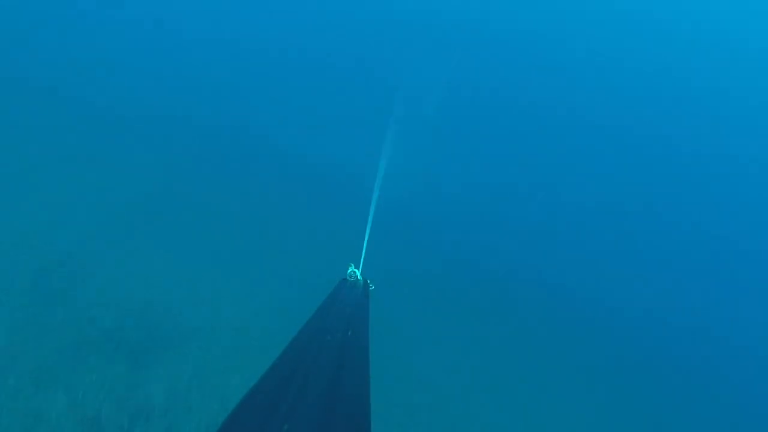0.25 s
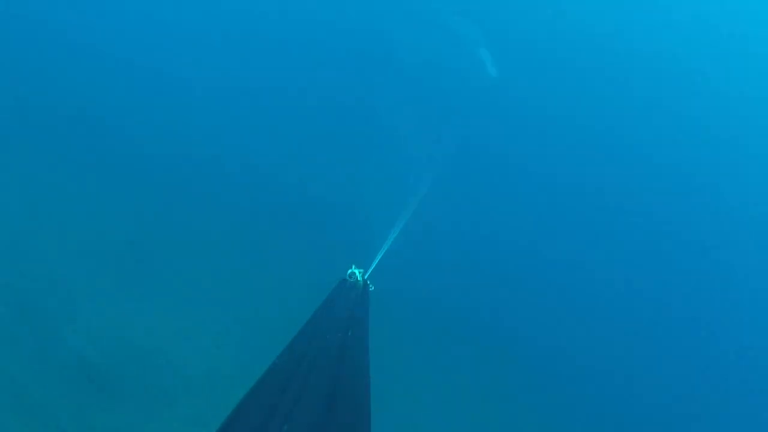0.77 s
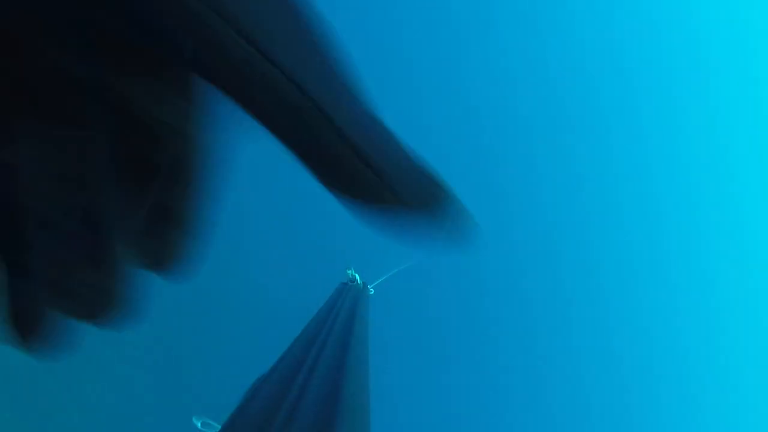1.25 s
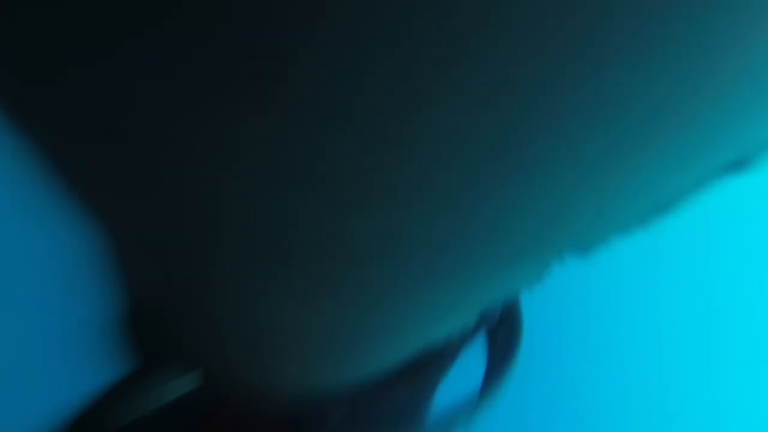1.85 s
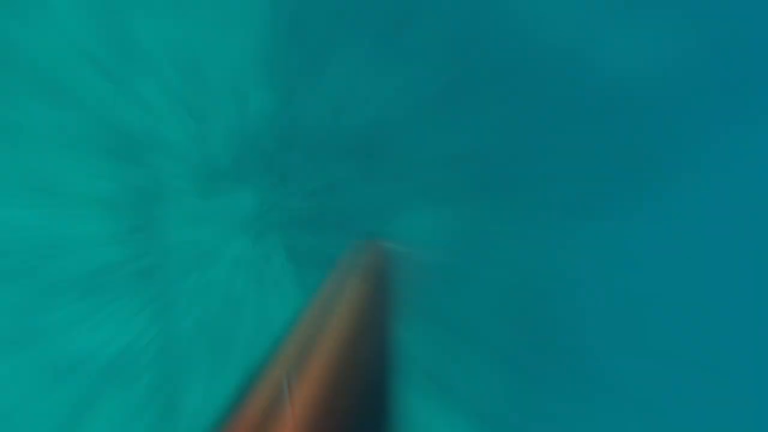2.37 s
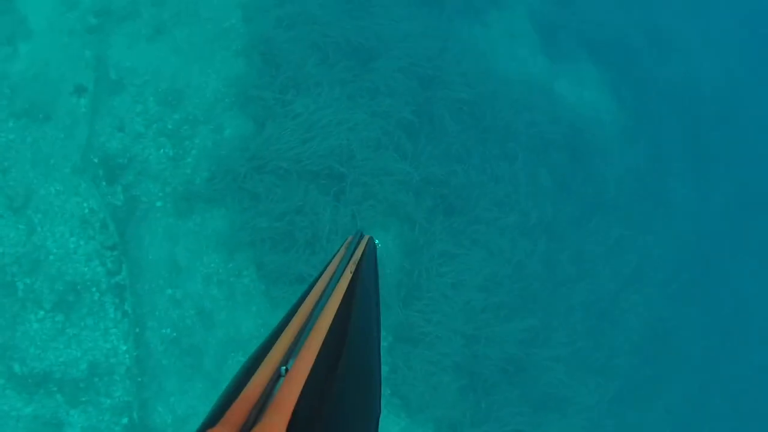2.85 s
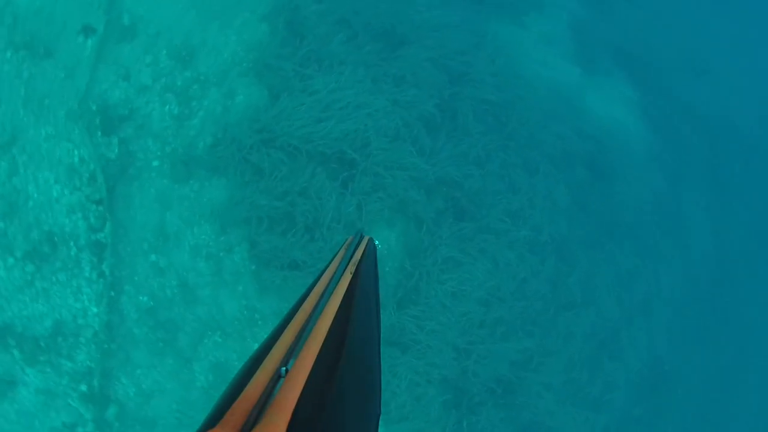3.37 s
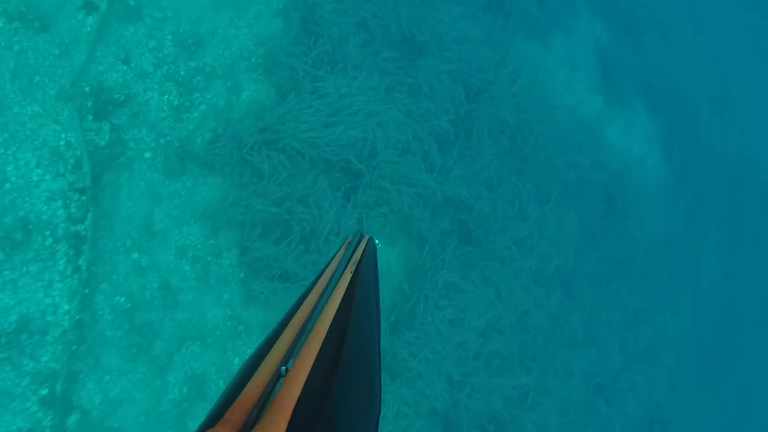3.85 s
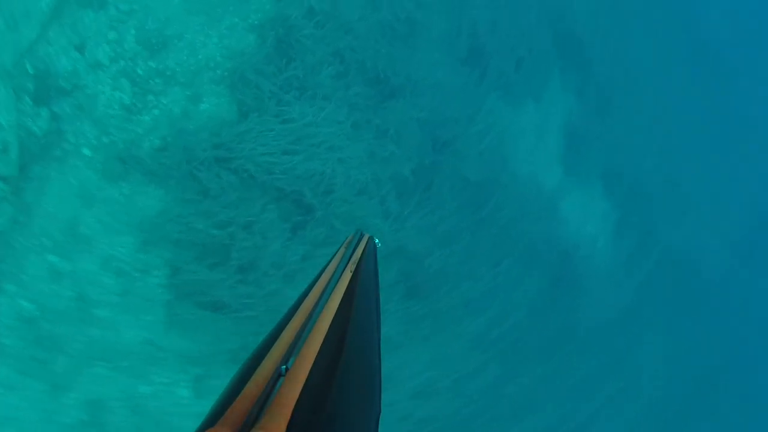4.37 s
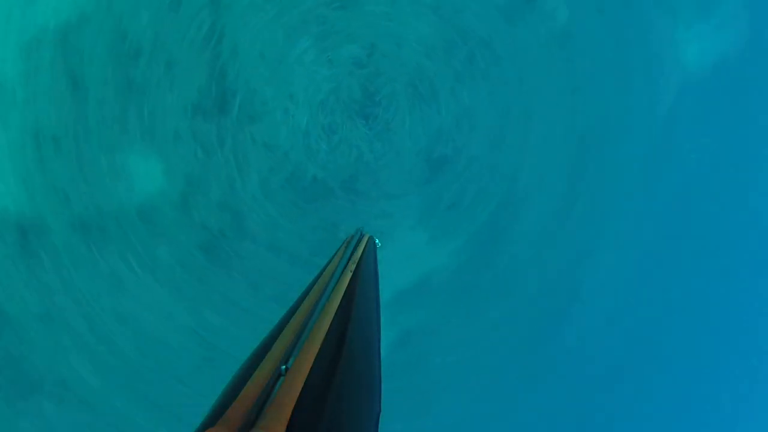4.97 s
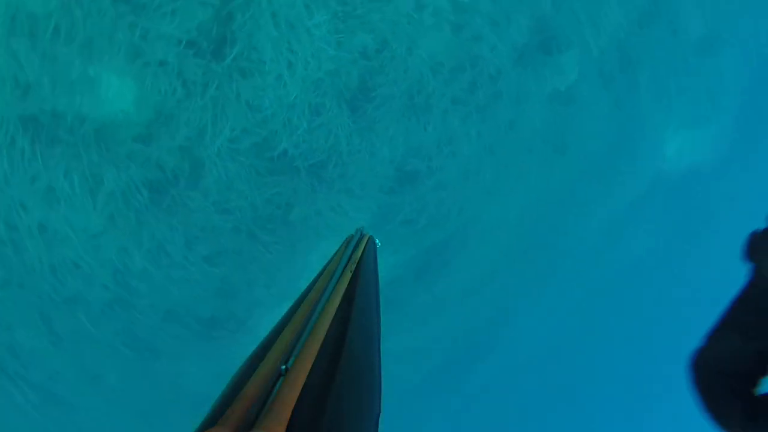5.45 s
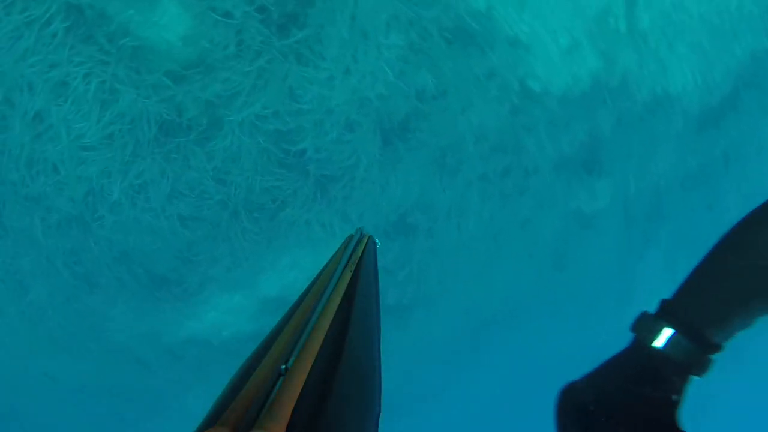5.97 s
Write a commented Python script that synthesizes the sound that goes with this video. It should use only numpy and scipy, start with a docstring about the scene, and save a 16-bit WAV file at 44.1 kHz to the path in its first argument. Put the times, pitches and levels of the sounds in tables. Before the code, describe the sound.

Muffled underwater glide: sinking hum, rushing water and squeaky glove handling fade abruptly into hushed sea, faint crackling clicks, soft stirrings and light taps.

```python
"""Water rushes past and a case drones, while a rubber-gloved hand rubs and shifts its grip, ticking and creaking.
A diver glides over sea grass with a camera; the microphone sits inside the sealed housing.
Then the sea is quiet: shrimp snap, something knocks softly, slow turns stir the water and loose gear taps.
Water is shaped noise and small grains, the drone a sinking tone; grip and gear are clicks rung through
the case, and shrimp are noise puffs and echoes. Table levels are relative: scene() trims the layers."""
import sys
import numpy as np
from scipy import signal
from scipy.fft import rfft, irfft
from scipy.io import wavfile
from scipy.ndimage import uniform_filter1d

SR = 44100
rng = np.random.default_rng(int(sys.argv[2]) if len(sys.argv) > 2 else 0)


def materialize(psi):
    """Save the field psi as 16-bit PCM at rate SR to the path in sys.argv[1].

    A 1-D psi becomes a single channel; in a 2-D psi each row is a channel.
    """
    bounded = np.clip(np.atleast_2d(psi).T, -1, 1)
    quanta = np.round(bounded * 32767).astype(np.int16)
    wavfile.write(sys.argv[1], SR, quanta)


N = 273861
TIME = np.arange(N) / SR

# The opening glide, dying to still water. Each row: time in seconds, buffeting in dB,
# rush of water and glove rubbing in dB.
GLIDE = [(0, -36, -37.5), (0.299, -32, -48.5), (0.6, -28, -55), (0.8, -28.5, -38.5), (1.25, -28, -41.5),
         (1.5, -34, -38), (1.62, -30.5, -31.5), (1.72, -20.5, -25.5), (1.789, -20.5, -24.5),
         (1.84, -30.5, -32), (1.93, -48, -42.5), (2.04, -35, -46.5), (2.25, -51.5, -53.5),
         (2.7, -56, -57.5)]
# Later turns of the body. Each row: full speed from in seconds, hold in seconds,
# buffeting in dB, gurgle in dB, wash in dB.
TURNS = [(2.891, 0.029, -41.5, -54.5, -53.5), (2.983, 0.063, -37.5, -49, -59.5),
         (3.198, 0.034, -50.5, -60.5, -63.5), (4.453, 0.11, -33, -45, -49), (4.65, 0.31, -39.5, -53, -49),
         (5.035, 0.046, -40, -52, -47.5), (5.251, 0.081, -53, -53.5, -54.5),
         (5.693, 0.22, -54.5, -55.5, -65)]
# Slow pressure swell at the housing, strong in the glide. Each row: time in seconds, level in dB.
SWELL = [(0, -34), (0.7, -26.5), (1.15, -22), (1.6, -27.5), (2.1, -29.5), (2.5, -46.5), (3.5, -47.5)]
# Spectra of the water against the housing. Each row: frequency in Hz, relative density in dB per Hz.
BUFFET_COLOUR = [(30, -29.5), (65, -9.5), (90, -6), (106, 8.5), (130, -10.5), (160, -8), (210, -20),
                 (330, -23.5), (430, -24.5), (600, -31), (1500, -45)]
RUSH_COLOUR = [(300, -7.5), (440, 2), (570, -12), (780, -2), (1000, 0.5), (1400, -9), (1850, -5.5),
               (2400, -8), (3200, -22.5), (6000, -37)]  # also the glove rubbing
GURGLE_COLOUR = [(300, -4), (440, -5.5), (570, -25.5), (740, -6.5), (870, 0), (1040, 2), (1250, -12),
                 (1450, -28), (2400, -16), (3200, -4)]
WASH_COLOUR = [(250, -13.5), (550, 2.5), (950, 8), (1400, 3.5), (1900, 0.5), (2450, -2), (2850, -8),
               (5000, -23.5)]
SWELL_COLOUR = [(10, -18), (22, -1), (30, -11.5), (45, -23), (80, -23), (300, -38), (1000, -80.5)]
TURN_RISE_S, TURN_FALL_S = 0.024, 0.063  # time constants
GLIDE_END_S = 2.39  # the water comes to rest
WAVER_DB, WAVER_KNOTS_PER_S = 4, 22  # the glide's buffeting wavers unevenly in level
BUFFET_EVENNESS = 0.48  # share of its own swings that a steady turn irons out


def water(buffet_db, rush_db, gurgle_db, wash_db, settle_s, gust_db):
    """Turbulence shakes the case near its main resonance; rush (with glove rubbing), gurgles, wash and swell."""
    buffet, rush = from_db(in_time(GLIDE))
    stirred_power = 0
    for start, hold, *levels in TURNS:
        envelope = held(start, start + hold, TURN_RISE_S, TURN_FALL_S)
        stirred_power = stirred_power + np.outer(from_db(levels), envelope) ** 2
    shake, gurgle, wash = np.sqrt(stirred_power)
    swell, = from_db(in_time(SWELL))

    waver = rms_one(from_db(WAVER_DB * drift(rate=WAVER_KNOTS_PER_S)))
    glide_buffet = buffet * waver * noise(BUFFET_COLOUR)
    turn_buffet = shake * evened(noise(BUFFET_COLOUR), BUFFET_EVENNESS)
    low = from_db(buffet_db) * (glide_buffet + turn_buffet)

    eddies = shower(count=1600, low_hz=600, high_hz=2600, cycles=20, spread_db=3.2)
    stream = rms_one(eddies) + from_db(-2) * rng.standard_normal(N)
    stream = stream * from_db(gust_db * drift(rate=69))
    moving = held(0, GLIDE_END_S, 1, settle_s)  # still water only hisses
    flowing = moving * rms_one(through(stream, pulse(RUSH_COLOUR)))
    still = (1 - moving) * noise(RUSH_COLOUR)
    glide = from_db(rush_db) * rush * (flowing + still)

    gurgling = from_db(gurgle_db) * gurgle * rms_one(through(stream, pulse(GURGLE_COLOUR)))
    washing = from_db(wash_db + gust_db * drift(rate=40)) * wash * noise(WASH_COLOUR)
    return low + glide + gurgling + washing + swell * noise(SWELL_COLOUR)


# Faint overtones of the drone. Each row: multiple of its pitch, level in dB re the tone.
DRONE_OVERTONES = [(2, -37.5), (3, -42.5), (4, -31.5), (5, -40.5)]
# The case hums above the drone. Each row: frequency in Hz, relative level in dB, 60 dB decay in seconds.
HUM_MODES = [(165, -28, 0.6), (228.5, -31.5, 0.29), (416.7, -26, 0.15), (510, -36.5, 0.22),
             (651, -39.5, 0.12)]
DRONE_HZ, DRONE_SAG_HZ_PER_S = 105.9, 49.3
DRONE_DB, DRONE_FADE_DB_PER_S = -12, 24.5  # rms at the start, before the waver
DRONE_END_S, DRONE_RELEASE_S = 0.344, 0.043  # release is a time constant


def drone(waver_db, hum_db):
    """Eddies lock to the case and drive one tone that sinks and fades as the flow slows; the case hums."""
    hz = DRONE_HZ - DRONE_SAG_HZ_PER_S * np.minimum(TIME, DRONE_END_S)
    level_db = DRONE_DB - DRONE_FADE_DB_PER_S * TIME + waver_db * drift(rate=71)
    gain = from_db(level_db) * held(0, DRONE_END_S, 1, DRONE_RELEASE_S)
    phase = 2 * np.pi * np.cumsum(hz) / SR
    overtones = sum(from_db(db) * np.sin(round(k) * phase) for k, db in DRONE_OVERTONES)
    tone = np.sin(phase) + overtones
    hum = 0
    for mode_hz, db, t60 in HUM_MODES:
        hum = hum + from_db(db) * evened(ring(rng.standard_normal(N), mode_hz, t60), share=0.59)
    return gain * np.sqrt(2) * tone + from_db(hum_db) * held(0, 0, 1, fall=0.55) * hum


# Single slips of rubber on the housing. Each row: start in seconds, relative peak in dB,
# sharp edge in dB re that, low boom in dB re that.
SLIPS = [(0.74, -16, -17.5, 0), (0.7497, -12, -8.5, -0.5), (0.756, -9.5, -16.5, 0), (0.764, -7, -27, -3.5),
         (0.773, -11, -10, 2), (0.8923, -10, -1, 2), (0.9097, -11, 0, 5), (1.0407, -10.5, 1.5, -1.5),
         (1.052, -8.5, -9.5, -1), (1.1101, -8.5, -5, -0.5), (1.1504, -14.5, 11, 4),
         (1.1612, -14.5, 8.5, 7.5), (1.1827, -20, 14, -2), (1.1897, -17, 4.5, -15.5), (1.1948, -9, 5, -8),
         (1.202, -15.5, 8, 4.5), (1.2065, -20, -8, 1.5), (1.2111, -9.5, -11, 2.5), (1.2965, -11.5, 0, 0),
         (1.3482, -15, 0, 6.5)]
# Creaks, where slips run together. Each row: start in seconds, length in seconds, first, middle and last
# slip rate in Hz, relative peak in dB, growth in dB, rubber resonance in Hz, contact ring in dB re the
# peak, contact ring in Hz.
CREAKS = [(1.119, 0.024, 210, 230.2, 164, -11.5, -4, 635, 11.5, 2130),
          (1.285, 0.06, 199.6, 150.5, 106, -11.5, 1.5, 805, -11, 1770),
          (1.362, 0.036, 98.3, 181, 114.4, -12.5, 0.5, 785, -11.5, 2040),
          (1.5005, 0.04, 166.6, 183.8, 140, -13.5, 2.5, 933, -19, 1300),
          (1.5974, 0.027, 186, 224.2, 165, -15, 0, 1020, -9.5, 1350),
          (1.655, 0.087, 159.8, 263.6, 202.4, -16.5, 0.5, 1110, -18, 1520),
          (1.772, 0.027, 228, 224, 176, -27, 10, 1270, 20.5, 2190),
          (1.851, 0.03, 280, 227.4, 233, -24, 3.5, 1120, -4, 1510)]
# Ringing of the case after a slip. Each row: frequency in Hz, relative level in dB, 60 dB decay in seconds.
CASE_MODES = [(102.3, -2.5, 0.15), (158, -44, 0.055), (240.5, -20, 0.14), (460, -27.5, 0.017),
              (910, -6, 0.023), (1210, -45.5, .025), (2030, -41, 0.058), (3495, -36, 0.026)]
# Spectra of a slip and of its sharp edge. Each row: frequency in Hz, relative density in dB per Hz.
SLIP_COLOUR = [(60, -25.5), (250, -2), (450, 2.5), (800, 7.5), (930, 8.5), (1080, -13.5), (1250, -5),
               (1450, -32), (2300, -17.5), (2600, -36), (3700, -26), (4600, -61), (9000, -64.5)]
EDGE_COLOUR = [(500, -34), (1200, 2), (1700, 13), (2350, 15), (2750, -18), (3700, 0), (4600, -9),
               (9000, -69)]
RUBBER_CUT_HZ = 4270  # rubber passes no high treble


def glove(slip_db, edge_db, creak_db, contact_db, creak_ring_db, grit_db, edge_lag_s):
    """Each slip of the gloved grip is one short pulse through the case wall, which then rings."""
    s, db, edge, boom = np.transpose(SLIPS)
    slips = clicks(s, db)
    creaks, creak_pulses, contact = sum(creak(row, uneven_db=1.4) for row in CREAKS)

    grit = from_db(grit_db) * scatter(slips + creaks, t60=0.03)
    edges = from_db(edge_db) * clicks(s + edge_lag_s, db + edge) + grit
    direct = from_db(slip_db) * through(slips, pulse(SLIP_COLOUR)) + through(edges, pulse(EDGE_COLOUR))

    creak_blows = from_db(creak_ring_db) * creaks
    boom_blows = clicks(s, db + boom) + creak_blows
    ringing = from_db(contact_db) * contact
    for k, (hz, mode_db, t60) in enumerate(CASE_MODES):
        blows = boom_blows if k == 0 else slips + creak_blows  # the boom is the lowest mode
        ringing = ringing + from_db(mode_db) * ring(blows, hz, t60)

    through_wall = bend(direct + ringing, hz=733, width_hz=950)
    soft = signal.butter(8, RUBBER_CUT_HZ, fs=SR, output="sos")
    return signal.sosfilt(soft, through_wall + from_db(creak_db) * creak_pulses)


# Faster slipping is weaker, sharper and rings higher: changes per octave of slip rate.
CREAK_LOSS_DB, CREAK_EDGE_DB, CREAK_RING_OCTAVES, RUBBER_GLIDE_OCTAVES = 0.5, 3.5, 0.55, 0.47
CREAK_JITTER = 0.08  # spread in cycles for a creak of 0 dB
CONTACT_WANDER, CONTACT_T60_S = 0.02, 0.016  # spread as a share of the pitch; 60 dB decay


def creak(row, uneven_db):
    """Rubber sticks and slips at an arching rate; gives the slips, their pulses and the contact ring."""
    s, length, first_hz, middle_hz, last_hz, db, growth_db, rubber_hz, edge_db, contact_hz = row
    early, strength, tension = rng.standard_normal((64, 3)).T
    place = 2 * (TIME - s) / length - 1  # -1 at the start, 1 at the end
    end_hz = np.where(place < 0, first_hz, last_hz)
    arch = middle_hz + (end_hz - middle_hz) * np.minimum(np.abs(place), 1) ** 2.5
    rate = arch * (np.abs(place) <= 1)
    turns = np.cumsum(rate) / SR
    count = int(turns[-1]) + 1
    at = np.searchsorted(turns, np.arange(count), side="right")
    # a harder grip slips less evenly
    times = at / SR + CREAK_JITTER * from_db(db) * early[:count] / rate[at]
    faster = np.log2(rate[at] / rate[at].mean())  # octaves
    peaks = db + growth_db * place[at] / 2 - CREAK_LOSS_DB * faster + uneven_db * strength[:count]

    pulses = np.zeros(N)
    resonances = rubber_hz * 2 ** (RUBBER_GLIDE_OCTAVES * faster)
    for start, peak, hz in zip((times * SR).astype(int), peaks, resonances):
        shape = from_db(peak) * rubber_pulse(hz)
        pulses[start:start + len(shape)] += shape

    pitches = contact_hz * 2 ** (CREAK_RING_OCTAVES * faster) * (1 + CONTACT_WANDER * tension[:count])
    contact = grains(times, peaks + edge_db + CREAK_EDGE_DB * faster, pitches, CONTACT_T60_S)
    return np.array([clicks(times, peaks), pulses, contact])


# Spectrum of a creak before its rubber lift. Each row: frequency in Hz, relative density in dB per Hz.
CREAK_COLOUR = [(60, 3.5), (300, 8.5), (520, -1.5), (720, 4), (900, 10.5), (1100, -0.5), (1270, 3.5),
                (1420, -9.5), (1560, 1), (1760, -14.5), (2050, -3), (2400, -12), (2750, -18), (3200, -27),
                (3600, -13), (4100, -14.5), (5100, -54), (9000, -69.5)]
RUBBER_BOOST_DB, RUBBER_WIDTH_OCTAVES = 12.5, 0.67


def rubber_pulse(hz):
    """One slip of a creak: the case wall's colour, lifted around the rubber's own broad resonance."""
    points, db = np.transpose(CREAK_COLOUR)
    octaves_away = np.log2(points / hz)
    lift = RUBBER_BOOST_DB * np.exp(-.5 * (octaves_away / RUBBER_WIDTH_OCTAVES) ** 2)
    return pulse(np.transpose([points, db + lift]), size=2048)


def bend(x, hz, width_hz):
    """Bending waves in the case wall spread a click in time: an all-pass, slowest near hz."""
    r = np.exp(-np.pi * width_hz / SR)
    poles = [1, -2 * r * np.cos(2 * np.pi * hz / SR), r * r]
    return signal.lfilter(poles[::-1], poles, x)


# Gear ticks, and later short rub strokes or gurgles as the water stirs. Each row: start in seconds,
# relative peak in dB, low ring in dB re that.
TICKS = [(0.02, -27.5, 1.5), (0.06, -27, -1), (0.128, -25, -3.5), (0.142, -25, -6), (0.167, -37.5, 4),
         (0.217, -20.5, -8), (0.238, -21, -6.5), (0.27, -16.5, -1.5), (0.313, -15.5, -9),
         (0.357, -14, -4.5), (0.463, -19, -1), (0.568, -23, 2.5), (0.675, -24, -1), (0.861, -30.5, -11),
         (0.884, -25.5, 2.5), (1.842, -16.5, -8.5), (4.477, -30, -20), (4.484, -26, -17), (4.541, -25, -6),
         (4.553, -30.5, -19), (4.567, -23.5, -8.5), (4.597, -29, -6), (5.059, -26, -22)]
# Ringing of the ticking gear. Each row: frequency in Hz, relative level in dB, 60 dB decay in seconds.
GEAR_MODES = [(401, 0.5, 0.079), (648, -13, 0.12), (763, 1.5, 0.044), (815, 2, 0.05), (968, 0, 0.071),
              (1188, -6, 0.062), (1268, -2.5, 0.045), (1787, -15.5, 0.025)]
# Spectrum of a tick heard through the case. Each row: frequency in Hz, relative density in dB per Hz.
TICK_COLOUR = [(300, -16), (600, -9.5), (880, 3), (1060, 1), (1200, 0), (1500, 2), (2100, -0.5),
               (3000, -15), (3750, -12.5), (5000, -30), (12000, -64.5)]


def gear(tick_db, rattle_db, ring_db):
    """A dry tick dulled by the case, a brief rattle and a ring; also stands for later rubs or gurgles."""
    s, db, low = np.transpose(TICKS)
    hits = clicks(s, db)
    lows = clicks(s, db + low + ring_db)
    struck = from_db(tick_db) * hits + from_db(rattle_db) * scatter(hits, t60=0.028)
    tick = through(struck, pulse(TICK_COLOUR))
    rattle = .8 * lows + .6 * scatter(lows, t60=0.03)
    ringing = 0
    for k, (hz, mode_db, t60) in enumerate(GEAR_MODES):
        ringing = ringing + (-1) ** k * from_db(mode_db) * ring(rattle, hz, t60)
    return tick + ringing


# Light scuffs as the grip loosens. Each row: start in seconds, length in seconds, relative level in dB.
SCUFFS = [(1.404, 0.057, -36.5), (1.57, 0.063, -33.5), (1.97, 0.035, -36), (2.011, 0.041, -39),
          (2.078, 0.045, -41), (2.198, 0.046, -41.5), (2.35, 0.045, -51), (2.425, 0.034, -38.5),
          (2.464, 0.022, -39.5), (2.494, 0.046, -36.5), (2.54, 0.043, -39), (2.609, 0.01, -37.5)]
# Spectrum of a scuff inside the housing. Each row: frequency in Hz, relative density in dB per Hz.
SCUFF_COLOUR = [(170, -17.5), (245, 2.5), (310, -24.5), (440, -6.5), (630, -23), (830, 5), (940, -0.5),
                (1060, -14.5), (1250, -9), (1600, -23), (2150, -14), (3200, -36)]
SCUFF_SLIPS_PER_S = 240  # centre of the wavering rate


def scuffs(level_db, hiss_db):
    """Short, light rubs swell and fade: a wavering run of tiny slips over a little hiss."""
    stroke = 0
    for s, length, db in SCUFFS:
        place = 2 * (TIME - s) / length - 1
        stroke = stroke + from_db(db) * np.sqrt(np.maximum(1 - place ** 2, 0))
    turns = np.floor(np.cumsum(SCUFF_SLIPS_PER_S * 2 ** (.4 * drift(rate=90))) / SR)
    slips = np.diff(turns, prepend=0) * from_db(4 * rng.standard_normal(N))
    rubbing = rms_one(through(slips, pulse(SCUFF_COLOUR)))
    return from_db(level_db) * stroke * (rubbing + from_db(hiss_db) * noise(SCUFF_COLOUR))


# Soft knocks on the case. Each row: start in seconds, relative level in dB, thud in dB re that.
KNOCKS = [(1.256, -26, 4.5), (1.945, -33, 4), (3.192, -28.5, -37), (4.130, -21.5, -12.5)]
# A push leaves the gear wobbling. The row: start in seconds, frequency in Hz, relative level in dB,
# 60 dB decay in seconds.
WOBBLE = (5.276, 22.3, -21, 0.85)


def knocks(thud_db):
    """A padded blow wakes only the low modes of the case; a push leaves the gear wobbling."""
    s, db, thud = np.transpose(KNOCKS)
    body = ring(clicks(s, db), hz=103.4, t60=0.082)
    body = body + ring(clicks(s, db + thud + thud_db), hz=216, t60=0.031)
    padding = signal.butter(8, 360, fs=SR, output="sos")
    s, hz, db, t60 = WOBBLE
    softness = signal.butter(2, 90, fs=SR, output="sos")
    push = signal.sosfilt(softness, clicks([s], [db]) + 1e-18)
    return signal.sosfilt(padding, body) - ring(push, hz, t60)


# Light taps of loose gear. Each row: start in seconds, relative level in dB.
TAPS = [(5.596, -36), (5.757, -53), (5.798, -43), (5.838, -37.5), (5.904, -36.5)]
# What a tap rings with. Each row: frequency in Hz, relative level in dB, 60 dB decay in seconds.
TAP_MODES = [(1060, -4.5, 0.027), (1860, 0, 0.037), (2650, -6, 0.021), (3720, -15, 0.016)]


def taps(level_db):
    """Loose gear touches lightly: a brief blurred contact rings a few modes."""
    s, db = np.transpose(TAPS)
    contact = signal.lfilter(signal.windows.hann(12), [1], clicks(s, db + level_db))
    ringing = 0
    for k, (hz, mode_db, t60) in enumerate(TAP_MODES):
        ringing = ringing + (-1) ** k * from_db(mode_db) * ring(contact, hz, t60)
    return ringing


# Pings of small bubbles. Each row: start in seconds, pitch in Hz, relative level in dB,
# 60 dB decay in seconds.
PINGS = [(0.033, 1866, -37, 0.085), (1.152, 1820, -27, 0.078), (1.213, 1790, -28, 0.034),
         (1.466, 1730, -40, 0.042), (1.773, 1166, -25.5, 0.072), (4.838, 970, -42, 0.032),
         (4.872, 1047, -40, 0.052), (4.922, 1040, -43, 0.035), (5.036, 960, -41, 0.051),
         (5.047, 1320, -42, 0.055), (5.072, 1030, -42, 0.055)]


def bubbles(level_db):
    """A freed bubble gives a short ping: a dying sine."""
    s, hz, db, t60 = np.transpose(PINGS)
    return grains(s, db + level_db, hz, t60)


# The shrimp bed in the background. Each row: time in seconds, relative level in dB.
SHRIMP = [(0, -68.5), (0.9, -71), (1.9, -74), (2.5, -67), (4.2, -68.5), (6.2, -66.5)]
# The loudest shrimp snaps. Each row: start in seconds, relative peak in dB,
# share smeared by the sea bed from 0 to 1, pitch in Hz.
SNAPS = [(0.066, -43.5, 0.46, 3700.0), (0.1446, -44, 0.2, 4500.0), (0.395, -48, 0.47, 5800.0),
         (0.582, -43, 0.4, 5000.0), (0.6522, -39, 0.6, 3800.0), (1.045, -37.5, 0.1, 3300.0),
         (2.639, -39, 0.3, 4000.0), (2.6576, -40.5, 0.28, 6030), (2.718, -41, 0.26, 4440),
         (3.034, -43, 0.23, 4580), (3.1605, -37, 0.16, 5400), (3.377, -39.5, 0.4, 4700.0),
         (3.492, -46, 0.27, 4760), (3.587, -39, 0.26, 4700.0), (3.6666, -45.5, 0.25, 5790),
         (3.683, -41.5, 0.54, 3800.0), (3.7233, -39, 0.45, 4400.0), (3.816, -42.5, 0.4, 5100.0),
         (4.1747, -37, 0.47, 3400.0), (4.23, -40.5, 0.22, 4640), (4.373, -44, 0.43, 4300.0),
         (4.6252, -38.5, 0.67, 4740), (4.698, -36, 0.9, 3300.0), (4.8095, -37, 0.5, 4400.0),
         (4.9503, -33, 0.72, 3830), (4.9764, -36.5, 0.63, 4550), (5.064, -36, 1, 3200.0),
         (5.108, -41.5, 0.74, 4200.0), (5.2545, -33, 0.95, 3300.0), (5.289, -33.5, 0.6, 4970),
         (5.3901, -38.5, 0.86, 3400.0), (5.414, -30.5, 0.43, 3570), (5.502, -46.5, 0.76, 5600.0),
         (5.584, -40, 1, 3330), (5.625, -43.5, 0.95, 3860), (5.674, -36.5, 0.63, 3860),
         (5.707, -48, 0.94, 3900.0), (5.756, -38, 0.6, 4100.0), (5.786, -43.5, 0.6, 4370),
         (5.8303, -43, 0.94, 3700.0), (5.849, -33, 0.6, 4600.0), (5.8597, -26, 0.45, 4300),
         (5.867, -51, 0.3, 4600.0), (5.944, -45, 0.7, 4300.0), (5.974, -40, 0.6, 4500.0),
         (5.9924, -26.5, 0.72, 3800.0), (6.043, -48, 0.7, 3600.0), (6.059, -36.5, 0.5, 3600.0),
         (6.075, -41.5, 0.73, 3900.0), (6.123, -45, 0.95, 3900.0), (6.158, -30.5, 0.49, 4500.0)]
# Spectra of the haze and of the smeared snaps. Each row: frequency in Hz, relative density in dB per Hz.
SHRIMP_COLOUR = [(600, -4), (1300, -16.5), (1800, -4.5), (2400, -6.5), (3200, -8), (3650, -0.5), (4600, -6),
                 (5300, -17), (6050, -10), (7200, -12.5), (8500, -20), (10200, -22.5), (12200, -21),
                 (15000, -35)]
FAR_COLOUR = [(700, -32), (1400, -5), (1850, 7.5), (2600, 2.5), (3700, 7.5), (5000, -17), (6500, -7.5),
              (9000, -28.5), (15000, -31)]
SNAP_T60_S, SNAP_ECHO_T60_S = 0.0037, 0.046  # 60 dB decays of the crack and its echo
SNAP_WIDTH = 0.55  # bandwidth as a share of the pitch


def shrimp(crackle_db, haze_db, snap_db, echo_db, far_db, crack_db):
    """Countless distant snaps merge into a haze; near ones are dry cracks with a short echo."""
    level, = in_time(SHRIMP)
    distant = crackle(count=900, low_hz=2800, high_hz=7500, spread_db=4)
    bed = from_db(level) * (from_db(crackle_db) * distant + from_db(haze_db) * noise(SHRIMP_COLOUR))
    s, db, smear, hz = np.transpose(SNAPS)
    dry_db = db + 20 * np.log10(np.clip(1 - smear, .01, 1))
    smeared_db = db + 20 * np.log10(np.clip(smear, .01, 1))
    near = puffs(s, dry_db + snap_db, hz, SNAP_T60_S, SNAP_WIDTH)
    echo = puffs(s, dry_db + echo_db, hz, SNAP_ECHO_T60_S, SNAP_WIDTH)
    far = from_db(far_db) * scatter(clicks(s, smeared_db), t60=0.051)
    cracks = np.diff(clicks(s, dry_db + crack_db), prepend=0)  # the bright first edge of a near snap
    return bed + near + echo + cracks + through(far, pulse(FAR_COLOUR))


def crackle(count, low_hz, high_hz, spread_db):
    """Distant snaps at random times, each blurred into a puff of its own pitch and length; rms 1."""
    when, pitch, rarity, blur = rng.random((count, 4)).T
    db = spread_db * np.minimum(-np.log(1 - rarity), 4)
    hz = low_hz * (high_hz / low_hz) ** pitch
    return rms_one(puffs(when * N / SR, db, hz, t60=.003 + .035 * blur ** 2, width=.55))


def puffs(times, db, hz, t60, width, size=3000):
    """Short dying bursts of noise, each with its own time, height, pitch and decay."""
    out, age = np.zeros(N + size), np.arange(size) / SR
    for s, height, pitch, decay in zip(*np.broadcast_arrays(times, from_db(db), hz, t60)):
        r = np.exp(-np.pi * pitch * width / SR)
        at = int(np.clip(s * SR, 0, N))
        poles = [1, -2 * r * np.cos(2 * np.pi * pitch / SR), r * r]
        dying = rng.standard_normal(size) * np.exp(-np.log(1000) * age / decay)
        burst = signal.sosfilt([[1, 0, -1.1, *poles]] * 2, dying)
        out[at:at + size] += height * burst / np.abs(burst).max()
    return out[:N]


def grains(times, db, hz, t60, size=2048):
    """Short dying sines, each with its own time, height, pitch and decay."""
    out, age = np.zeros(N + size), np.arange(size) / SR
    for s, height, pitch, decay in zip(*np.broadcast_arrays(times, from_db(db), hz, t60)):
        at = int(np.clip(s * SR, 0, N))
        fade = np.exp(-np.log(1000) * age / decay)
        out[at:at + size] += height * np.sin(2 * np.pi * pitch * age) * fade
    return out[:N]


def shower(count, low_hz, high_hz, cycles, spread_db):
    """Grains at random times and pitches; most are small, a few are large."""
    when, pitch, rarity = rng.random((count, 3)).T
    hz = low_hz * (high_hz / low_hz) ** pitch
    db = spread_db * np.minimum(-np.log(1 - rarity), 4)
    return grains(when * N / SR, db, hz, cycles / hz)


def from_db(db):
    """Decibels to gain."""
    return 10 ** (np.asarray(db) / 20)


def rms_one(x):
    """Scale to rms 1."""
    return x / np.sqrt(np.mean(x ** 2) + 1e-20)


def in_time(rows):
    """Each column of a curve at every sample."""
    s, *columns = np.transpose(rows)
    return [np.interp(TIME, s, c) for c in columns]


def drift(rate):
    """Slow random wander, joining knots of spread 1 at this many a second."""
    knots = rng.standard_normal(4000)
    return np.interp(TIME * rate, np.arange(len(knots)), knots)


def held(start, end, rise, fall):
    """An envelope that swells up to its start, holds, and dies away after its end."""
    return np.exp(np.minimum(TIME - start, 0) / rise - np.maximum(TIME - end, 0) / fall)


def evened(x, share):
    """Iron out a share of a narrow noise's swings in level; rms 1."""
    power = uniform_filter1d(x ** 2, size=900)
    return rms_one(x / (power + .02 * power.mean()) ** (np.clip(share, 0, 1) / 2))


def clicks(times, db):
    """One click of the given height at each time."""
    out = np.zeros(N)
    at = np.round(np.asarray(times) * SR).astype(int)
    np.add.at(out, np.clip(at, 0, N - 1), from_db(db))
    return out


def through(x, response):
    """Pass a sound through an impulse response."""
    return signal.fftconvolve(x, response)[:N]


def pulse(colour, size=16384):
    """The shortest causal (minimum-phase) pulse that has this colour; peak 1."""
    hz, db = np.transpose(colour)
    grid = np.linspace(0, SR / 2, size // 2 + 1) + 1
    octaves_beyond = np.maximum(np.log2(grid / hz[-1]), 0) + np.maximum(np.log2(hz[0] / grid), 0)
    gain = from_db(np.interp(np.log(grid), np.log(hz), db) - 12 * octaves_beyond)
    cepstrum = irfft(np.log(gain))
    shape = irfft(np.exp(rfft(2 * cepstrum[:size // 2], size)))
    return shape / np.abs(shape).max()


def noise(colour):
    """Coloured noise of rms 1."""
    return rms_one(through(rng.standard_normal(N), pulse(colour)))


def ring(x, hz, t60):
    """A resonator: a unit click sets a sine of height 1 ringing, down 60 dB after t60 seconds."""
    r, w = from_db(-60 / (t60 * SR)), 2 * np.pi * hz / SR
    return signal.lfilter([0, np.sin(w)], [1, -2 * r * np.cos(w), r * r], x + 1e-18)


def scatter(hits, t60):
    """A dying spray of echoes after each click, with the energy of that click."""
    r = from_db(-120 / (t60 * SR))  # per sample, on power
    power = signal.lfilter([1 - r], [1, -r], hits ** 2 + 1e-24)
    return np.sqrt(power) * rng.standard_normal(N)


def scene():
    """Everything reaches the one microphone through the case."""
    flow = water(buffet_db=-0.5, rush_db=-6.0, gurgle_db=0.5, wash_db=-1.0, settle_s=0.092, gust_db=3)
    flow = flow + drone(waver_db=1.5, hum_db=-13)
    hand = glove(slip_db=4.0, edge_db=-12.5, creak_db=3.0, contact_db=-20.0,
                 creak_ring_db=1, grit_db=-16, edge_lag_s=0.0012)
    handling = gear(tick_db=-9, rattle_db=-3, ring_db=-6) + scuffs(level_db=-3.0, hiss_db=-9.5)
    handling = handling + knocks(thud_db=9.0) + taps(level_db=-12)
    sea = bubbles(level_db=2)
    sea = sea + shrimp(crackle_db=3.5, haze_db=4.5, snap_db=8, echo_db=-9, far_db=10.0, crack_db=-3)
    return (flow + hand + handling + sea)[None, :]


CUTOFF_HZ = 15400


def record(dry):
    """The slowest drift and the top of the treble are cut."""
    dry = signal.sosfilt(signal.butter(1, 3, "high", fs=SR, output="sos"), dry)
    return signal.sosfilt(signal.ellip(10, .1, 80, CUTOFF_HZ, fs=SR, output="sos"), dry)


dry = scene()
out = record(dry)
materialize(out)
```